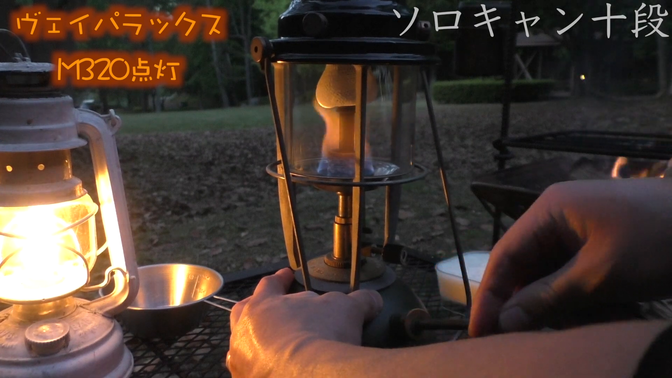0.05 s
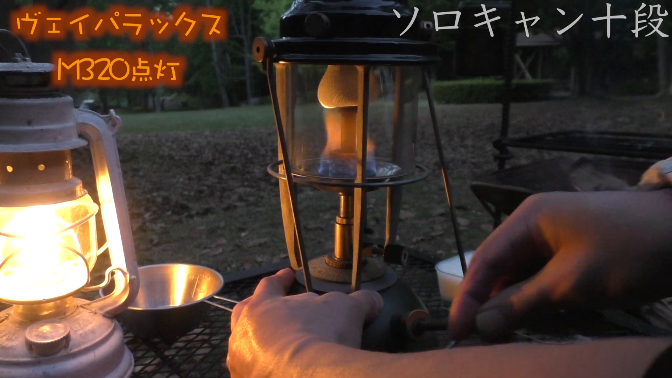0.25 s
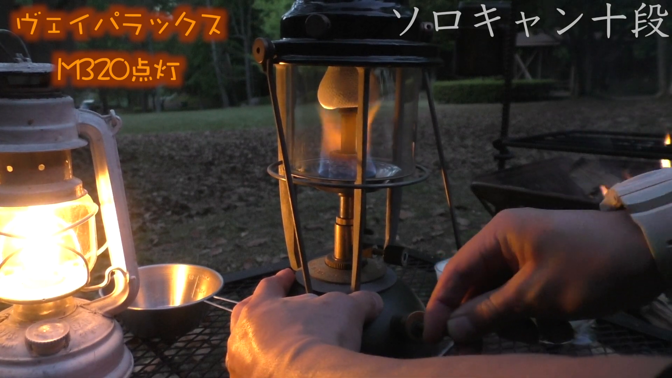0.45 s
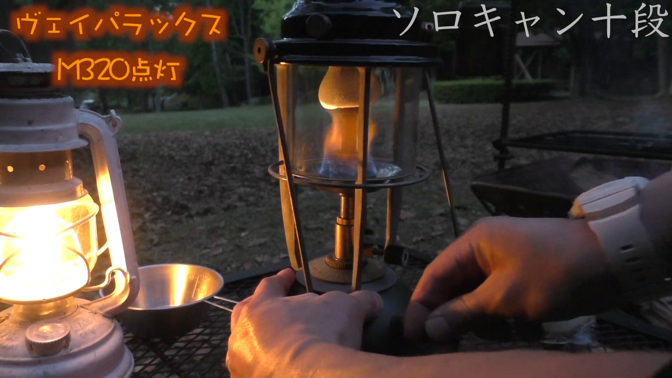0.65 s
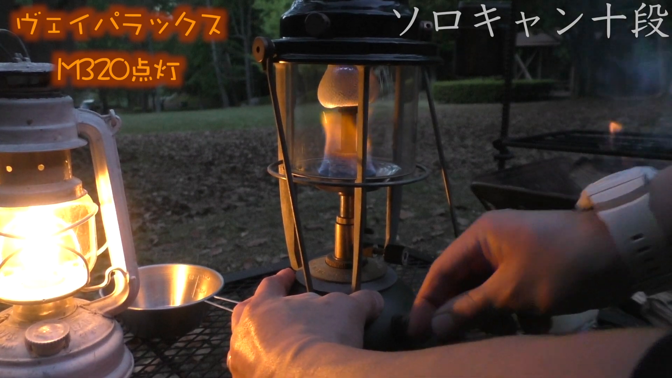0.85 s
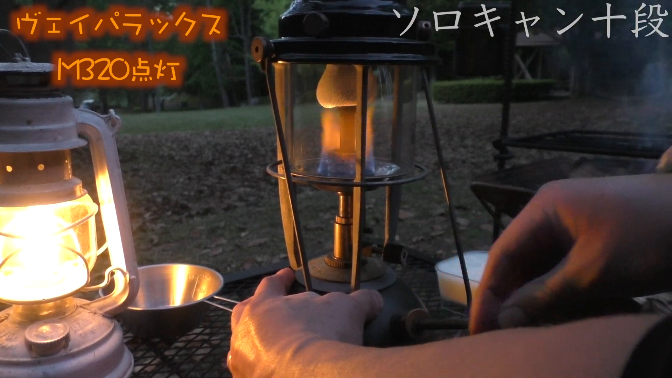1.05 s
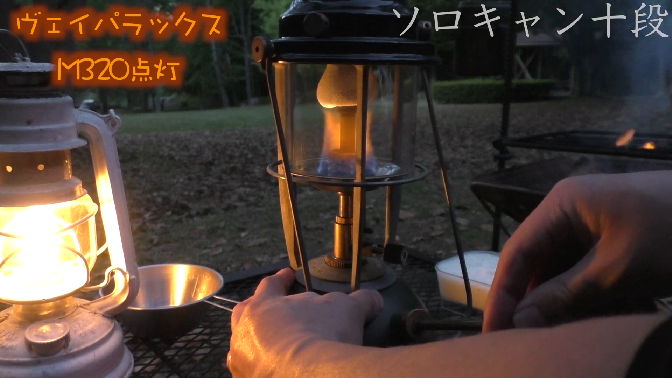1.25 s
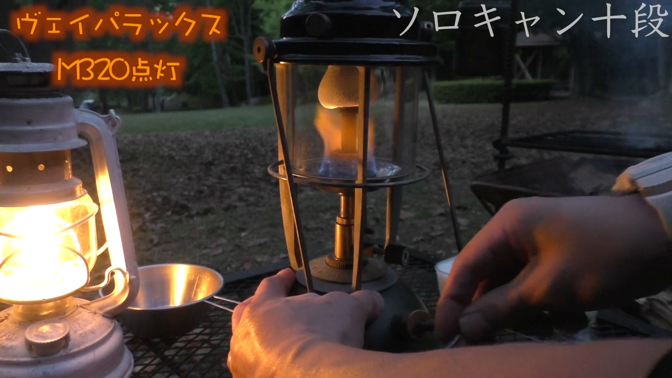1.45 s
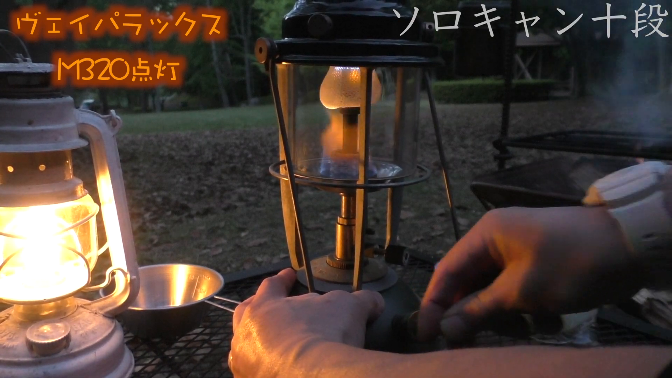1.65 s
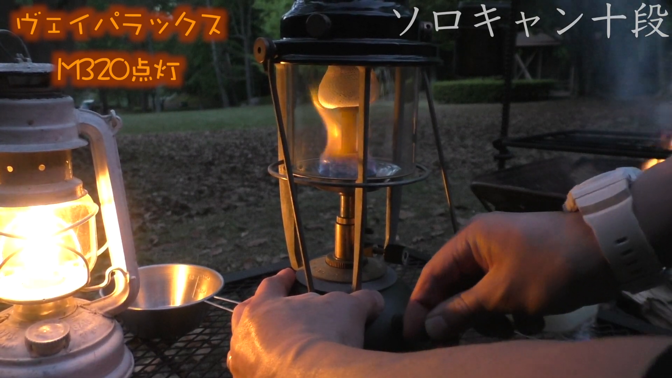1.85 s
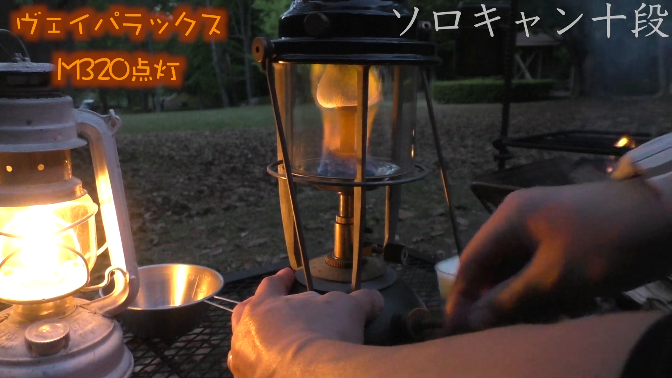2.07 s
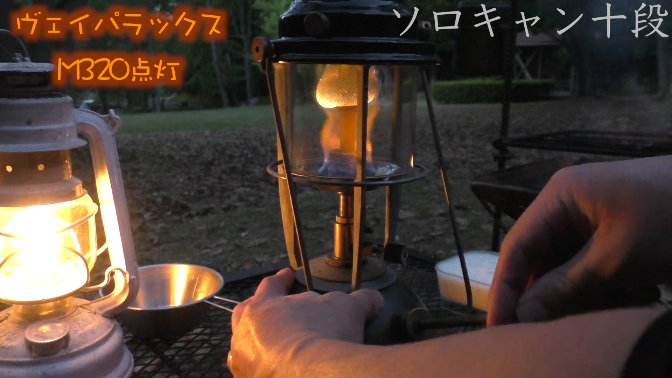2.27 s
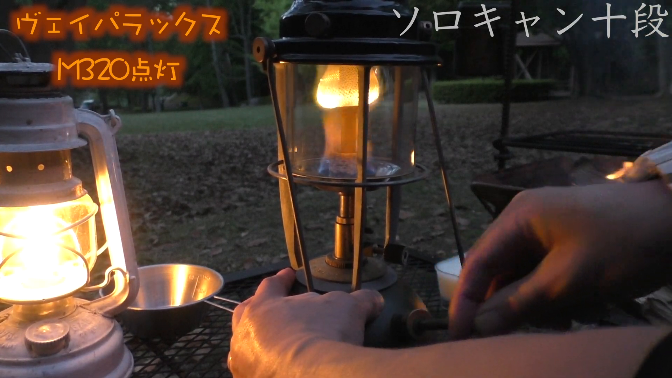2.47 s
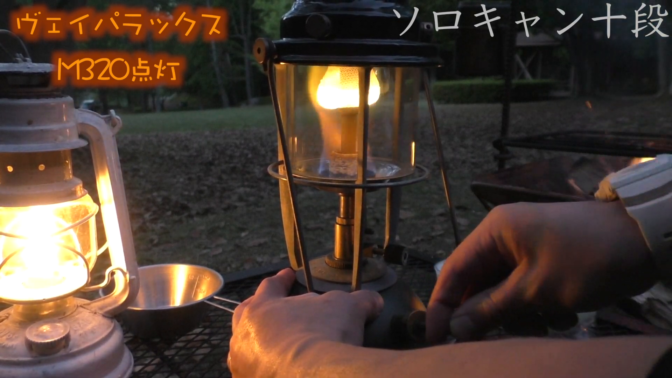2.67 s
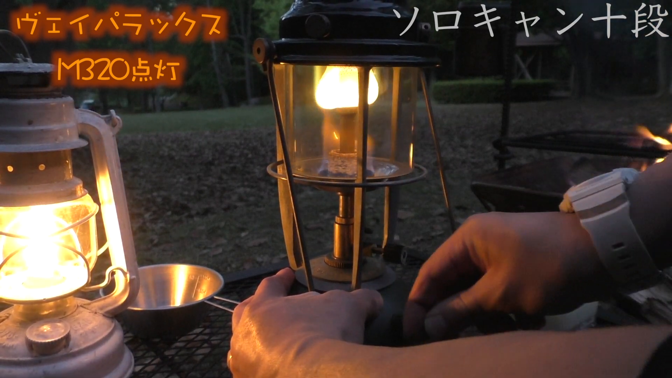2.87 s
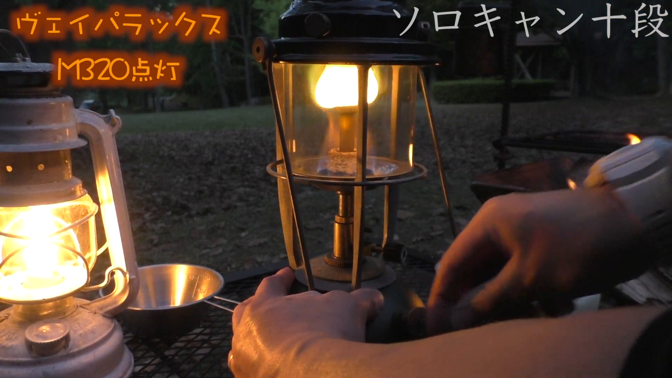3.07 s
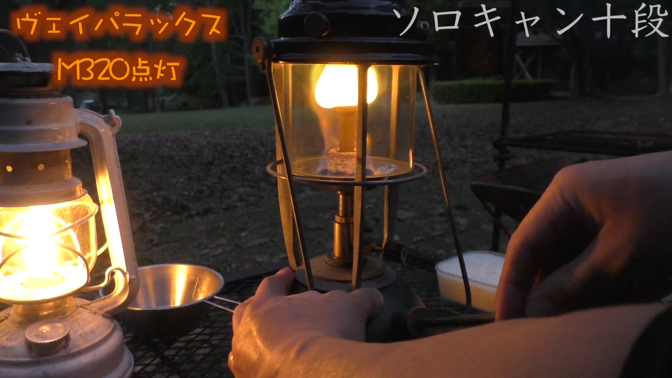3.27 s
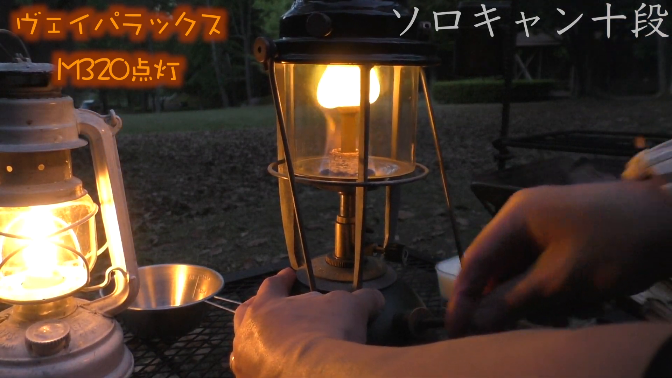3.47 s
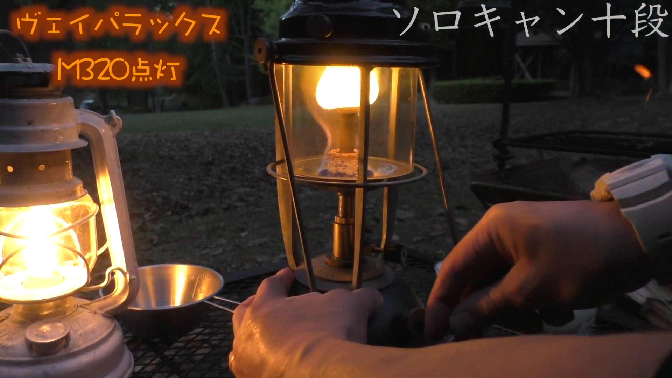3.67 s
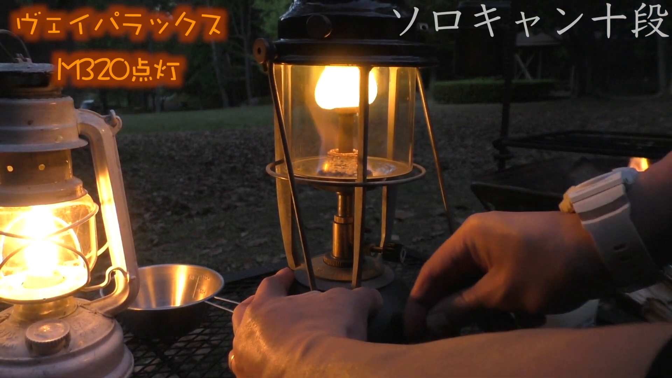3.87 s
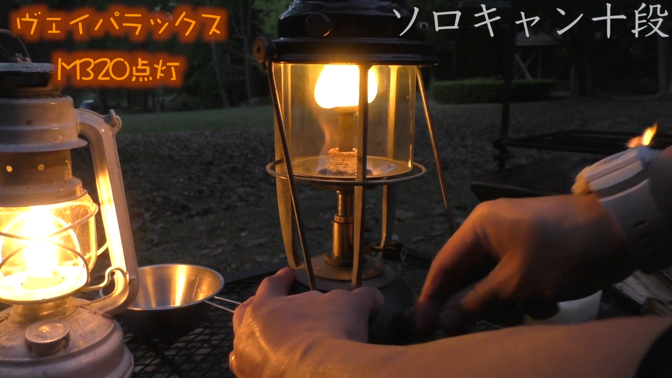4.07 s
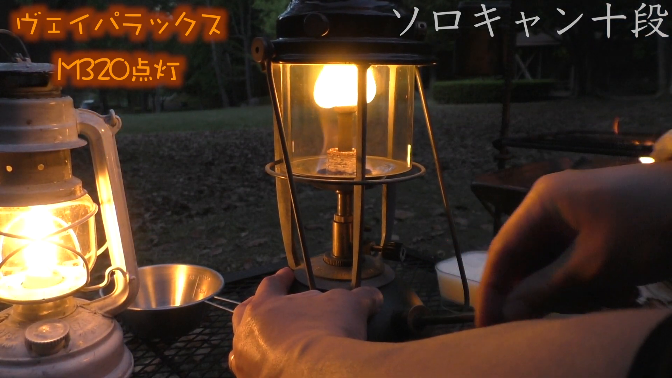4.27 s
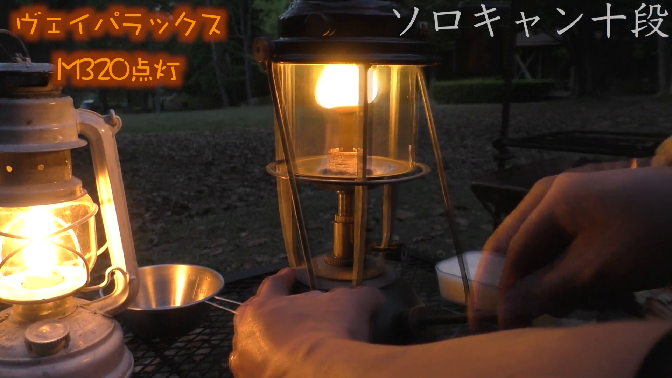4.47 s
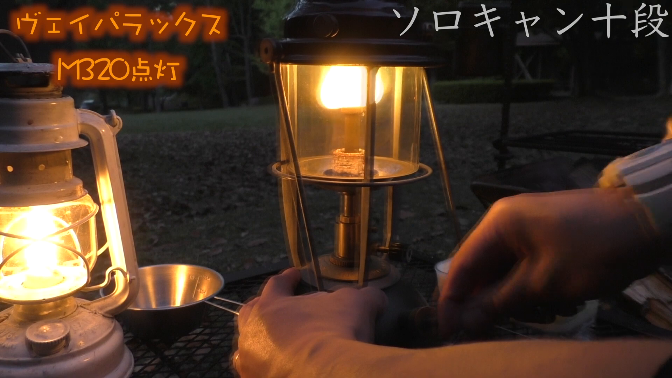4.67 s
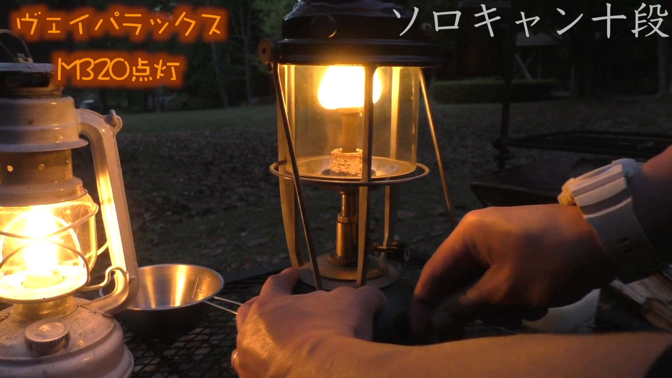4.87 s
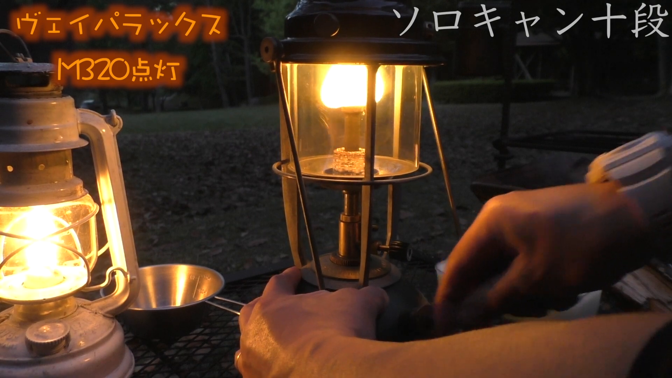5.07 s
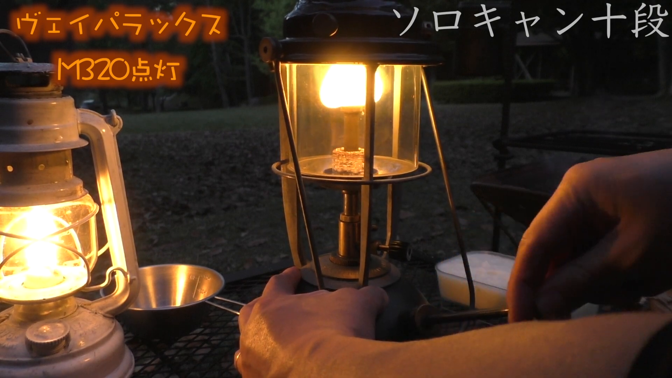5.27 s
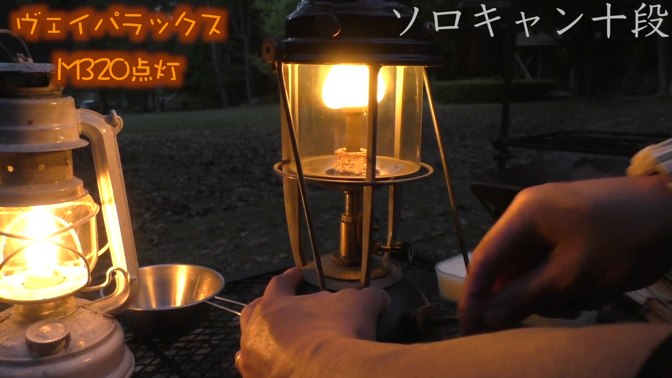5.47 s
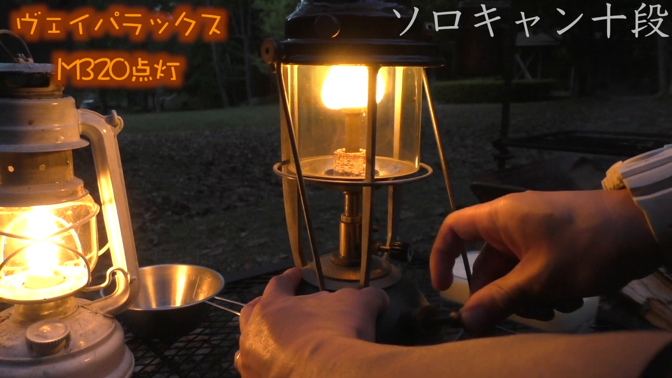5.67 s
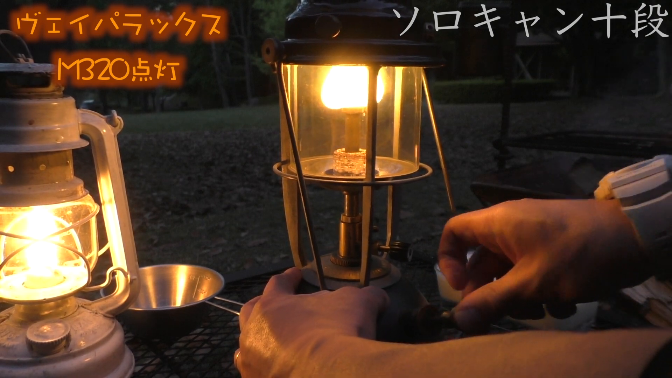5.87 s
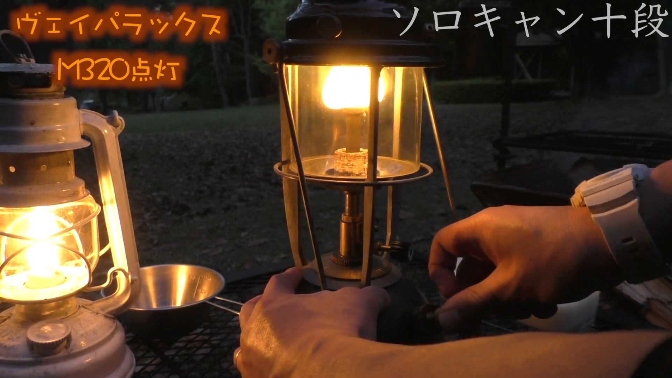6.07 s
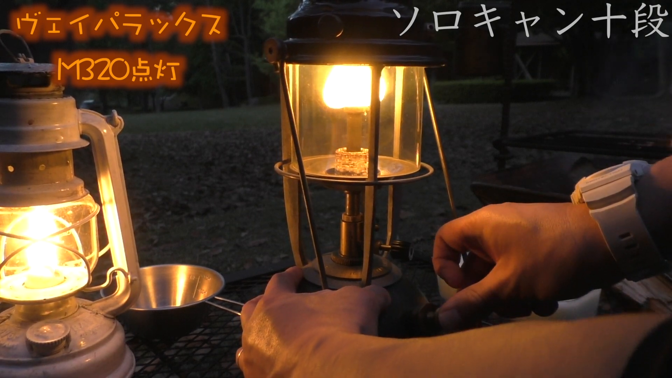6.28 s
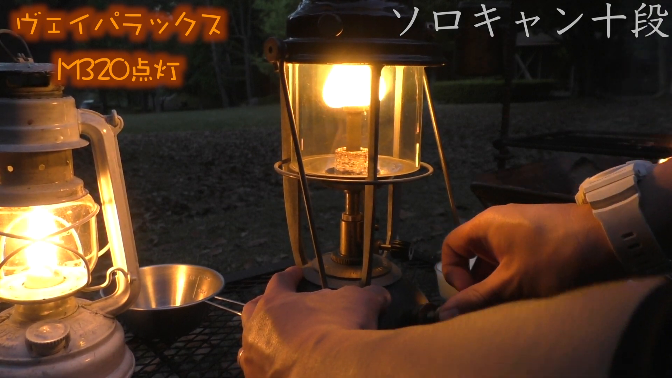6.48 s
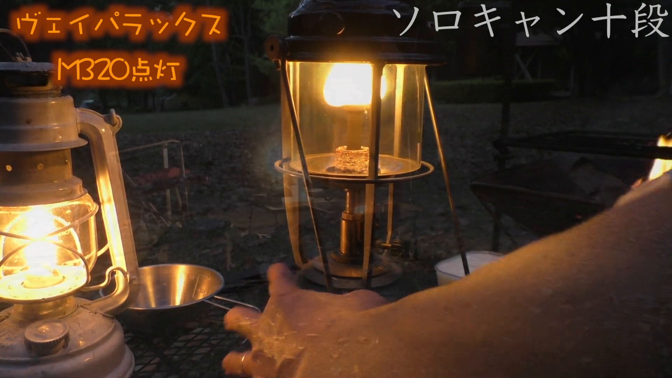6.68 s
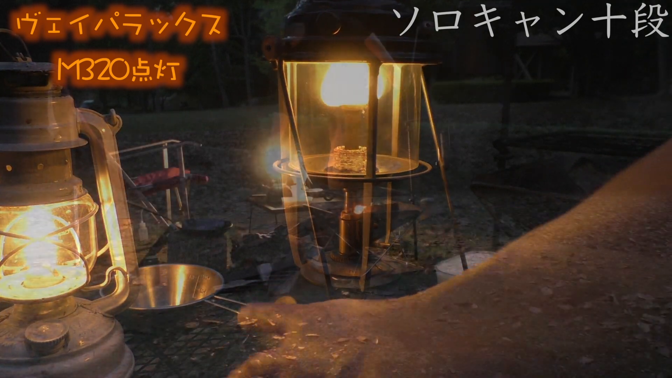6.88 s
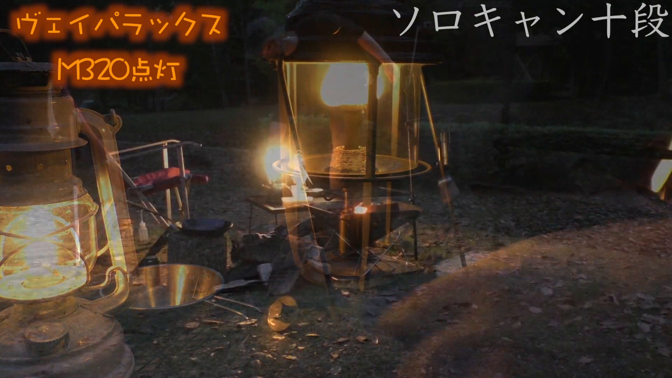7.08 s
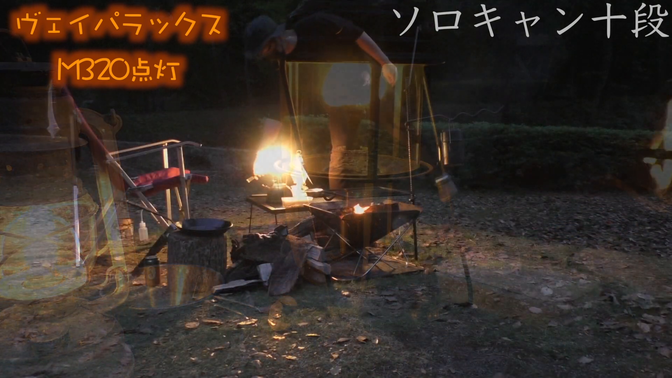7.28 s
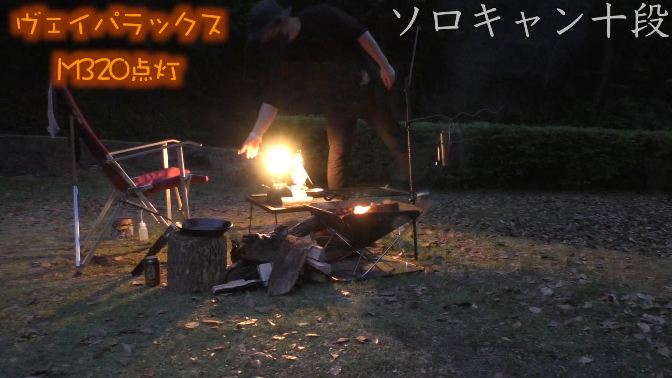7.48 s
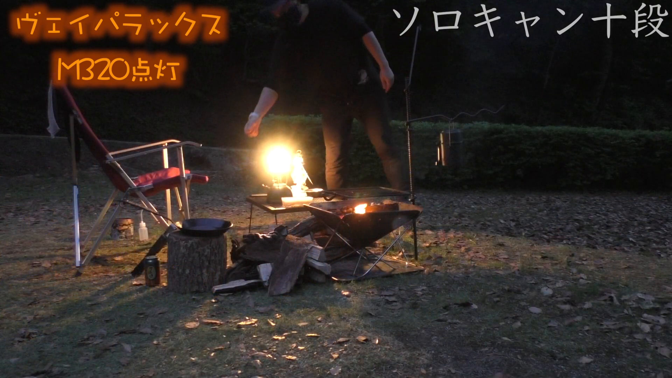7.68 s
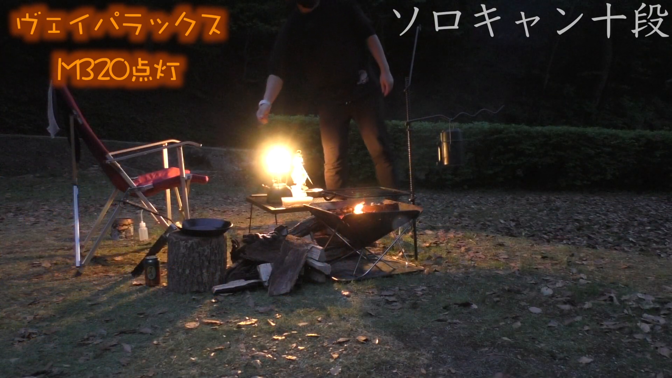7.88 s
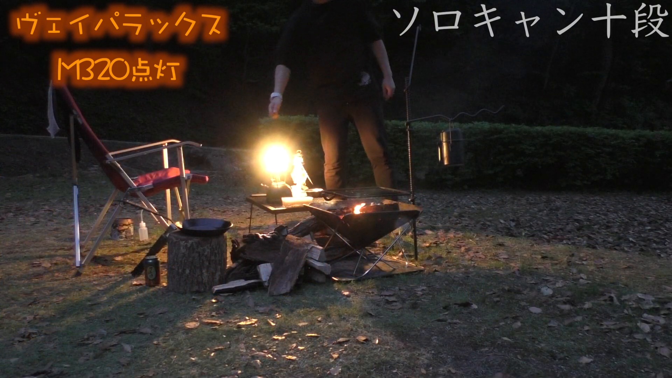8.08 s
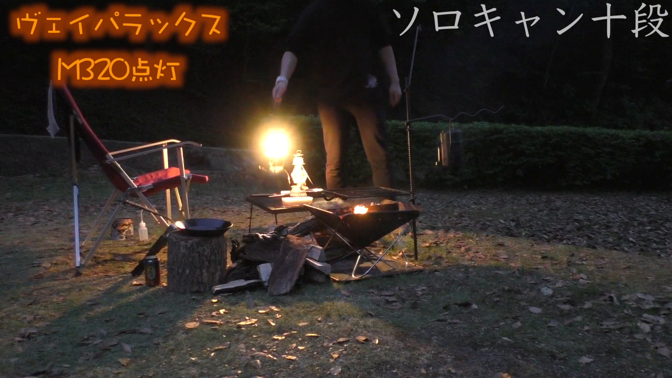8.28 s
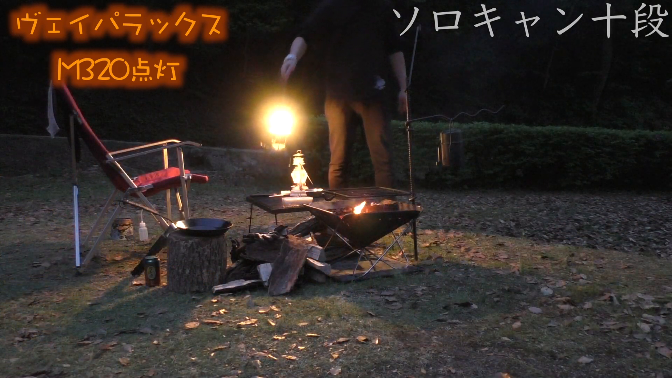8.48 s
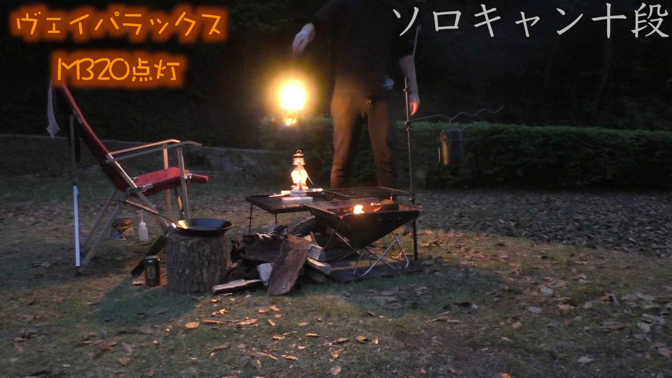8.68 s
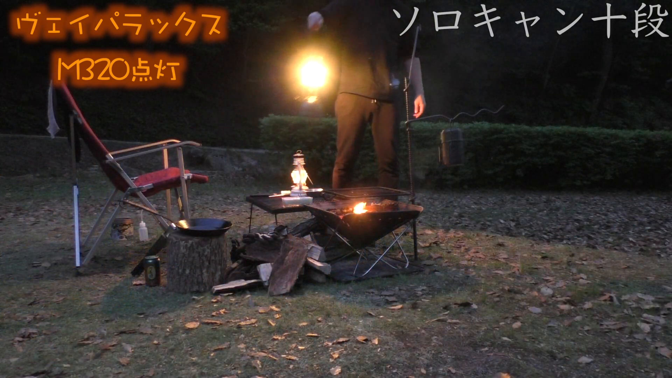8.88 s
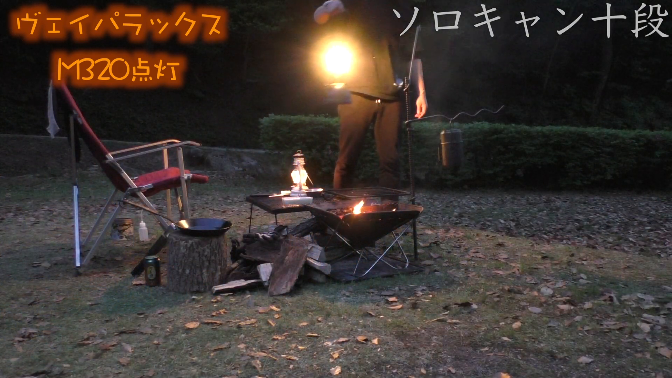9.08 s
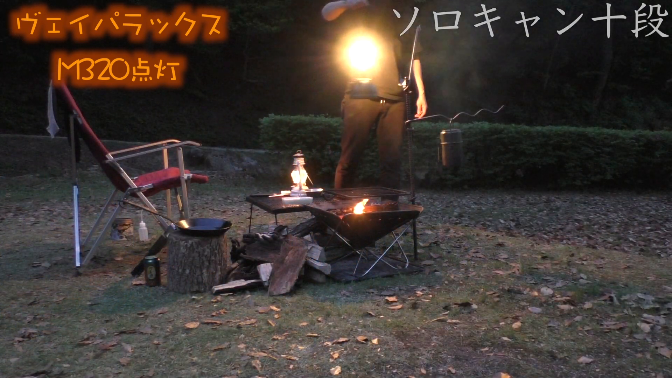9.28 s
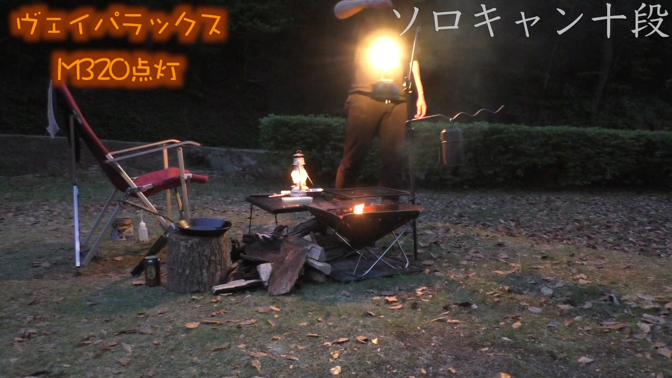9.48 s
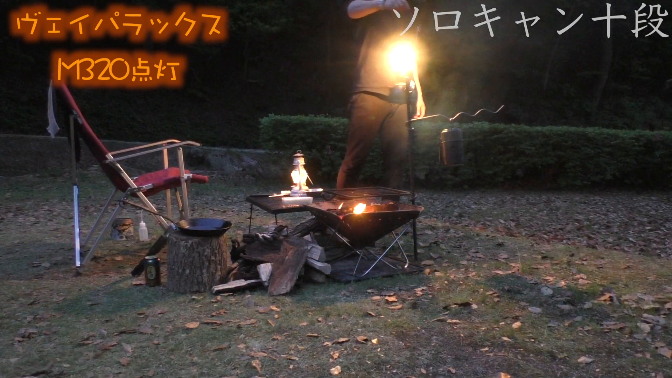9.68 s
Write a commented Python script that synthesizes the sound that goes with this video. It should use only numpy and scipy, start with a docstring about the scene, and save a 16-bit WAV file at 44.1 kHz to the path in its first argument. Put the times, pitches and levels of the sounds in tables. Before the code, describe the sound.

Close by in the open air, with low rumble and a soft distant rush, a lantern plunger is worked six times. Every push makes a crowding run of dry chuffs, a bubbly gurgle and a loud metal crack. Small flames pop and briefly flutter, while the burner hiss rises in steps. After a short squeak and grind of the knob, the near hiss fades into a fainter far one with sparse crackle and ticks.

```python
"""A low rumble and distant rush surround a lantern; metal ticks, fire crackle and faint flame pops begin.
Six pump strokes follow: the check valve chatters faster and faster as decaying noise bursts, bubble tones
gurgle through the fuel, and the plunger clacks home as a noise crack with brass modes while air seeps on.
Volleys of pressure pulses pop in the flame, and the burner's resonant noise hiss grows in steps.
The pump knob squeaks shut in harmonic tones; the hiss then fades from near to far beside the crackle."""
import sys
import numpy as np
from scipy import signal
from scipy.fft import rfft, irfft, next_fast_len
from scipy.io import wavfile
from scipy.ndimage import uniform_filter1d, minimum_filter1d, map_coordinates

SR = 44100
rng = np.random.default_rng(int(sys.argv[2]) if len(sys.argv) > 2 else 0)


def master_out(mix):
    """Clip the mix to full scale and print it as 16-bit PCM to the path in sys.argv[1]."""
    frames = np.transpose(np.atleast_2d(mix))
    ceiling = np.clip(frames, -1, 1)
    pcm = np.round(ceiling * 32767).astype(np.int16)
    wavfile.write(sys.argv[1], SR, pcm)


N = 429534  # length of the scene in samples


def amp(db):
    """Level definition: decibels to amplitude gain."""
    return 10 ** (np.asarray(db) / 20)


def unit(x):
    """Normalisation: scale to rms 1."""
    return x / np.sqrt(np.mean(x ** 2) + 1e-20)


def along(points, hz):
    """Logarithmic frequency scale: interpolate (f/Hz, value) points on it."""
    f, value = np.transpose(points)
    return np.interp(np.log(hz + 1), np.log(f), value)


def curves(rows, **ends):
    """Linear interpolation: one value per sample for each column after the time."""
    times, *columns = np.transpose(rows)
    return [np.interp(np.arange(N) / SR, times, column, **ends) for column in columns]


def ramp(start, length):
    """Linear onset: rises from 0 to 1 over length seconds."""
    return np.clip((np.arange(N) / SR - start) / length, 0, 1)


def wobble(rate):
    """Band-limited fluctuation: a smooth random curve through rate knots a second."""
    knots = rng.standard_normal(int(N * rate / SR) + 4)
    return map_coordinates(knots, [np.arange(N) * rate / SR])


def add(track, s, sound):
    """Superposition: mix a sound into a track at time s."""
    part = track[max(round(s * SR), 0):][:len(sound)]
    part += sound[:len(part)]


def filtered(x, response):
    """Linear filtering: multiply the spectrum of x by a response of frequency."""
    m = next_fast_len(N + 8192)
    return irfft(rfft(x, m) * response(np.fft.rfftfreq(m, 1 / SR)), m)[..., :N]


# Interchannel coherence of the sounds close by: f/Hz, left-right likeness/1
PUMP_COHERENCE = [(100, 0.51), (1000, 0.93), (14000, .95)]


def noise(spectrum, peaks=(), alike=PUMP_COHERENCE):
    """Source-filter principle: stereo noise of rms 1, shaped by a spectrum and bell-shaped resonances."""
    def response(hz):
        db = along(spectrum, hz)
        for centre, width, lift in peaks:
            db = db + lift * np.exp(-2 * ((hz - centre) / width) ** 2)
        # The angle shares the power between mid and side.
        turn = np.arccos(np.clip(along(alike, hz), 0, 1)) / 2
        return amp(db) * [np.cos(turn), np.sin(turn)]
    mid, side = filtered(rng.standard_normal((2, N)), response)
    return unit(np.array([mid + side, mid - side]))


def patchy(x, depth_db, size):
    """Turbulent intermittency: gain varies in patches of time and frequency."""
    z = signal.stft(x, nperseg=size)[2]
    field = uniform_filter1d(rng.standard_normal(z.shape[1:]), size=3, axis=0)
    field = uniform_filter1d(field, size=5, axis=1)
    varied = signal.istft(z * amp(depth_db * unit(field)), nperseg=size)[1]
    return unit(varied[:, :N])


def decays(rows, attack):
    """Exponential decay: envelope of bursts (t/s, level/dB, T60/s), summed in power."""
    power, t = np.zeros(N), np.arange(SR // 5) / SR
    for s, db, t60 in rows:
        burst = amp(db - 60 * t / t60) * (1 - np.exp(-t / attack))
        add(power, s, burst ** 2)
    return np.sqrt(power)


# Background level: t/s, rumble level/dB, distant rush level/dB
AIR_LEVELS = [(0, -51, -47), (2.5, -50.5, -48.5), (4.5, -52.5, -49), (6.5, -47, -48.5), (7.3, -53.5, -52),
              (9.74, -55, -49.5)]
# Spectral density of the rumble: f/Hz, relative level/dB
RUMBLE_SPECTRUM = [(20, -25), (50, -8), (120, 1), (250, 1.5), (350, -2), (440, -7), (560, -19), (800, -28),
                   (2000, -55)]
# Spectral density of the distant rush: f/Hz, relative level/dB
RUSH_SPECTRUM = [(100, 3.5), (400, -2), (600, -7), (800, -2.5), (1150, 2.5), (1750, 0.5), (2200, 3.5),
                 (2900, -5.5), (4500, -9.5), (7000, -12.5), (9000, -9), (16000, -12)]
# Interchannel coherence of the air, burner and gutter noise: f/Hz, left-right likeness/1
AIR_COHERENCE = [(30, .5), (120, 0.44), (400, 0.81), (2000, 0.74), (14000, 0.93)]


def campsite():
    """Ambient broadband noise: a low restless rumble and a soft distant rush."""
    rumble_db, rush_db = curves(AIR_LEVELS)
    rumble = patchy(noise(RUMBLE_SPECTRUM, alike=AIR_COHERENCE), depth_db=3.5, size=2048)
    rumble = amp(1.5 * wobble(9)) * rumble
    rush = patchy(noise(RUSH_SPECTRUM, alike=AIR_COHERENCE), depth_db=1.3, size=1024)
    rush = amp(.5 * wobble(6)) * rush
    rumble_balance = amp([[.7], [-.7]])  # left, right
    return amp(rumble_db) * rumble * rumble_balance + amp(rush_db) * rush


# Ticks of the handled metalwork: t/s, body level/dB, treble level/dB
METAL_TICKS = [(0.32, -40, -39), (1.148, -49, -45), (1.6, -36, -56), (1.898, -42, -39), (2.124, -28, -37),
               (2.207, -39, -32), (2.339, -35, -49), (2.4724, -30, -50), (3.0925, -36, -32.5),
               (3.235, -50, -31), (3.584, -39, -32.5), (4.017, -34.5, -33), (6.257, -28, -37),
               (6.588, -29.5, -26.5), (7.201, -47, -44), (7.874, -35.5, -48), (7.946, -38, -42),
               (8.138, -40, -35.5), (8.2818, -27, -24), (8.329, -35, -42)]
# Modes of the wire frame: f/Hz, level relative to the tick body/dB, T60/s
FRAME_MODES = [(1520, -15.5, .15), (2130, -14, 0.1), (3870, -20, 0.1), (4360, -21, 0.11),
               (8000, -16, 0.063)]
# Spectral density of a tick's body: f/Hz, relative level/dB
TICK_BODY_SPECTRUM = [(200, -16), (700, -3), (1600, 8), (3500, 1), (6000, -4), (16000, -30)]
# Spectral density of tick treble and fire crackle: f/Hz, relative level/dB
TICK_TREBLE_SPECTRUM = [(2000, -33), (5000, -3), (8500, 12), (12000, 6), (16000, 2)]


def ticks(crackle_db=-50, spread_db=4.5):
    """Impact excitation: metal ticks ring the frame's modes among the fire's faint random crackle."""
    sparks = []
    for u, v in rng.random((70, 2)):
        spark_db = crackle_db + spread_db * min(-np.log(1 - v), 3)
        sparks.append((u * N / SR, spark_db, .02))
    ring, t = np.zeros(N), np.arange(SR // 5) / SR
    hz, level, t60 = np.transpose(FRAME_MODES)[:, :, None]
    for s, body_db, _ in METAL_TICKS:
        strength_db = rng.normal(0, 2.4, hz.shape)
        modes = amp(body_db + level + strength_db - 60 * t / t60) * np.sin(2 * np.pi * hz * t)
        add(ring, s, modes.sum(axis=0))
    bodies = [(s, body_db, .035) for s, body_db, _ in METAL_TICKS]
    trebles = [(s, treble_db, .028) for s, _, treble_db in METAL_TICKS]
    body = decays(bodies, attack=0.00087) * noise(TICK_BODY_SPECTRUM)
    treble = decays(trebles + sparks, attack=0.0003) * noise(TICK_TREBLE_SPECTRUM)
    return ring + body + treble


# Pop volleys: t/s, length/s, pops/1, first level/dB, swell over the volley/dB, pulse width/s
POP_VOLLEYS = [(.818, .03, 3, -27, 0, .00055), (1.5067, .0125, 3, -18, 2, .0006),
               (1.7905, .0055, 2, -17, 2, .0007), (1.8056, .0105, 4, -11, 1, .00042),
               (2.7027, .009, 3, -17, 3, .0006), (7.948, 0, 1, -35, 0, .0006),
               (8.2838, 0, 1, -24, 0, .0006), (9.149, 0, 1, -34, 0, .0006)]
# Spectral density of the sputter after a pop: f/Hz, relative level/dB
SPUTTER_SPECTRUM = [(40, -27), (150, -21), (320, 1.5), (650, -21), (1100, -6.5), (1600, -17), (2500, -29),
                    (6000, -25.5), (15000, -44)]
# Resonances of the air in the glass globe: f/Hz, width/Hz, lift level/dB
GLOBE_RESONANCES = [(330, 67, 12.5), (930, 120, 17), (1060, 72, 6)]
# Guttering of the priming flame: t/s, level/dB, T60/s
FLAME_GUTTERS = [(4.035, -22, 0.21), (4.105, -16.5, 0.21)]
# Spectral density of the guttering: f/Hz, relative level/dB
GUTTER_SPECTRUM = [(20, -1), (50, 5), (110, 3), (200, -1), (350, -19), (700, -40), (2000, -80)]
GUTTER_RISE_S = 0.025
MURMUR_UNTIL_S, MURMUR_DB = 3.6, -44.5  # faint random pops of the priming flame; quietest level


def flame(suck=0.25, lag=3.1, sputter_db=-7):
    """Monopole radiation: each pop pushes air, sucks more slowly and sputters; the priming flame gutters."""
    pops, sputters = np.zeros(N), []
    t = np.arange(-SR // 100, SR // 50) / SR
    murmur = [(u * MURMUR_UNTIL_S, 0, 1, MURMUR_DB + 8 * v, 0, .0008) for u, v in rng.random((36, 2))]
    for start, length, count, first_db, swell_db, width in POP_VOLLEYS + murmur:
        for part in np.linspace(0, 1, count):
            late, wider = rng.standard_normal(2) * [.0004, .25]
            s = start + part * length + late
            db = first_db + part * swell_db
            u = t / (width * np.exp(wider))
            push = np.exp(-u ** 2)
            pull = suck * np.exp(-((u - lag) / 3.9) ** 2)
            add(pops, s + t[0], amp(db) * (push - pull) / (1 - suck))
            sputters.append((s, db + sputter_db, .025))
    sputter = decays(sputters, attack=0.00011) * noise(SPUTTER_SPECTRUM, GLOBE_RESONANCES)
    gutter = decays(FLAME_GUTTERS, attack=GUTTER_RISE_S) * noise(GUTTER_SPECTRUM, alike=AIR_COHERENCE)
    return (pops + sputter + gutter) * amp([[2], [-2.2]])  # left, right


# Pump strokes: t/s, first gap/s, exponent/1, valve level/dB before offsets, rise over the stroke/dB
# Chuff k comes k ** exponent first gaps after t.
PUMP_STROKES = [(.5472, .030, .783, -16, -.5), (1.6303, .0245, .785, -19, 4), (2.7225, .0205, .83, -18, 3),
                (3.7115, .0255, .75, -17, 5), (4.742, .0225, .785, -21, 9), (5.8735, .0245, .75, -17, -1)]
# Spectral density of a chuff: f/Hz, relative level/dB
CHUFF_SPECTRUM = [(40, -31), (150, 5), (500, -5.5), (1000, 7), (1600, 4), (2300, 3.5), (3200, -6.5),
                  (5300, -5.5), (8500, -3), (11000, -8.5), (16000, -16.5)]
# Resonances of the valve bore: f/Hz, width/Hz, lift level/dB
BORE_RESONANCES = [(1570, 72, 5.5), (4420, 390, 8.5), (6220, 500, 6), (8150, 600, 2.5), (12100, 820, 2.5)]


def valve(push_db=1.5, t60=0.0077, linger_db=-8, unseat_db=1, scatter_db=2.57):
    """Modulated jet noise: the check valve's uneven chuffs crowd together as the plunger speeds up."""
    chuffs = []
    for (start, gap, exponent, db, rise_db), (stop, *_) in zip(PUMP_STROKES, PLUNGER_STOPS):
        times = start + gap * np.arange(10) ** exponent
        progress = (times - start) / (stop - start)
        levels = push_db + db + rise_db * progress + scatter_db * rng.standard_normal(10)
        levels[0] += unseat_db  # the first chuff unseats the valve
        chuffs += [(s, level, t60) for s, level in zip(times, levels) if s < stop]
    opening = decays(chuffs, attack=.0013)
    leak = decays([(s, db + linger_db, .07) for s, db, _ in chuffs], attack=.002)
    rasp = amp(1.2 * wobble(500))
    return np.hypot(2 * opening, leak) * rasp * noise(CHUFF_SPECTRUM, BORE_RESONANCES)


def bubbles(pitch_hz, spread, cycles, size_db, count):
    """Damped bubble resonance: a steady swarm of short rising tones, rms 1."""
    t = np.arange(SR // 80) / SR
    when, pitch = rng.random(count), rng.standard_normal(count)
    size = np.minimum(rng.exponential(size=count), 3)
    turns = pitch_hz * np.exp(spread * pitch)[:, None] * t
    life = turns / cycles
    envelope = np.exp(-life) * (1 - np.exp(-2 * turns))
    tones = amp(size_db * size)[:, None] * np.sin(2 * np.pi * turns * (1 + life / 20)) * envelope
    places = (when * N).astype(int)[:, None] + np.arange(len(t))
    return unit(np.bincount(places.ravel(), tones.ravel(), N)[:N])


# Spectral density of the seeping hiss: f/Hz, relative level/dB
SEEP_SPECTRUM = [(100, 0), (400, 0.5), (1300, -0.5), (2500, -2), (4000, -5), (7000, -9), (16000, -20)]
BUBBLING_DB = -33.5  # air forced through the fuel, before gurgle and bass loss


def fuel(hiss_db=-2):
    """Bubble acoustics: air gurgles in during the stroke, then seeps on and dies away in fizz and hiss."""
    push, seep, t = np.zeros(N), np.zeros(N), np.arange(SR) / SR
    for (start, *_), (stop, *_, seep_db, half_life, _) in zip(PUMP_STROKES, PLUNGER_STOPS):
        stroke = signal.windows.tukey(int((stop - start) * SR), .15)
        add(push, start, amp(BUBBLING_DB) * stroke)
        add(seep, stop, amp(seep_db) * .5 ** (t / half_life))
    forced = bubbles(pitch_hz=575, spread=0.53, cycles=6.6, size_db=2.5, count=4000)
    fizz = bubbles(pitch_hz=1112, spread=0.686, cycles=2.44, size_db=3.5, count=3500)
    seeping = (fizz + amp(hiss_db) * noise(SEEP_SPECTRUM)) / np.sqrt(2)
    gurgle = amp(2 * wobble(35))
    swarm = gurgle * (push * forced + seep * seeping)
    return filtered(swarm, lambda hz: hz / np.hypot(hz, 260))  # the small tank radiates little bass


# Plunger stops: t/s, scrape level/dB, ring level/dB, ring tilt/(dB/octave), crack level/dB,
# seep level/dB, seep half-life/s, step of burner hiss level/dB
PLUNGER_STOPS = [(.6974, -23.5, -1, -1, -5.5, -36, .06, 0), (1.7516, -17, -1, 0, -4.5, -41, 0.26, 1),
                 (2.835, -22, 1, -0.5, -2, -37.5, 0.23, 4), (3.8275, -23, -1.5, -5, -8, -31, 0.084, -0.1),
                 (4.8485, -17, -2, -2.5, -9, -24.5, 0.09, 4.5), (5.9859, -21, -1, 5, -1.5, -34.5, 0.23, -1)]
# Modes of the pump tube and tank: f/Hz, relative level/dB, T60/s
BRASS_MODES = [(1120, -13, .02), (1310, -7, .013), (1505, 0, .019), (2155, 0, .024), (2440, -15, .014),
               (2800, -4, .023), (3470, -16, .018), (3780, -18, .016), (4160, -18, .016), (5770, -21, .018)]
# Snags of the rod: t/s, level/dB, T60/s
ROD_SNAGS = [(2.8194, -18, 0.055), (4.824, -27, 0.033), (4.858, -21, .04), (4.883, -24, 0.057),
             (4.976, -29.5, 0.04), (5.963, -3.5, 0.031)]
# Spectral density of the crack: f/Hz, relative level/dB
CRACK_SPECTRUM = [(30, -5), (110, 8), (300, -25), (700, -13), (1300, 7), (4000, -1), (6200, -11), (9000, 3),
                  (11000, -7.5), (13000, -9), (16000, -16)]
# Spectral density of the rod's scrape: f/Hz, relative level/dB
SCRAPE_SPECTRUM = [(40, -42), (200, -18), (1500, 12), (3000, 14.5), (5000, 6.5), (9000, 4), (12000, 0.5),
                   (16000, -9)]
# Spectral density of the bright snag rasp: f/Hz, relative level/dB
SNAG_SPECTRUM = [(40, -42), (200, -21), (1500, -5), (3000, 1), (5000, 5.5), (9000, 7), (11500, 8),
                 (13500, 3), (16000, -10)]
SCRAPE_LEAD_S, SCRAPE_T60_S = 0.0077, 0.13  # the rod scrapes in its cap just before the stop


def plunger():
    """Modal impact: the rod scrapes and snags; the plunger's stop cracks and rings the brass briefly."""
    ring, t = np.zeros(N), np.arange(SR // 10) / SR
    hz, level, t60 = np.transpose(BRASS_MODES)[:, :, None]
    octaves = np.clip(np.log2(hz / 1800), -1, .6)
    cracks, scrapes = [], []
    for stop, scrape_db, ring_db, tilt, crack_db, *_ in PLUNGER_STOPS:
        strength_db, detune = rng.standard_normal((2, len(BRASS_MODES), 1))
        colour_db = level + strength_db + tilt * octaves
        modes = amp(colour_db - 60 * t / t60) * np.sin(2 * np.pi * hz * (1 + .007 * detune) * t)
        add(ring, stop, amp(ring_db) * modes.sum(axis=0) * (1 - np.exp(-t / 0.0006)))
        cracks.append((stop, crack_db, .02))
        scrapes.append((stop - SCRAPE_LEAD_S, scrape_db, SCRAPE_T60_S))
    crack = decays(cracks, attack=.0001) * noise(CRACK_SPECTRUM)
    scrape = decays(scrapes, attack=0.00022) * noise(SCRAPE_SPECTRUM)
    snag = decays(ROD_SNAGS, attack=.00013) * noise(SNAG_SPECTRUM)
    return ring + crack + scrape + snag


# Spectral density of the near jet: f/Hz, relative level/dB
NEAR_JET_SPECTRUM = [(100, 1), (400, -1.5), (1500, 0), (3200, -1.5), (6000, -6), (10000, -4), (14000, -6),
                     (16000, -8)]
# Burner resonances heard near: f/Hz, width/Hz, lift level/dB
NEAR_RESONANCES = [(3970, 400, 7), (5030, 600, 10), (6450, 480, 9), (8700, 1000, 10), (11250, 1100, 8.5),
                   (12100, 550, 8.5), (13050, 500, 7), (15100, 1300, 6)]
# Far burner: t/s, level/dB
FAR_LEVELS = [(6.8, -73.5), (7.1, -53.5), (8.2, -52.5), (9.3, -54), (9.55, -50), (9.74, -51)]
# Spectral density of the far jet: f/Hz, relative level/dB
FAR_JET_SPECTRUM = [(300, -7.5), (1500, 5.5), (4000, 7), (8000, -2.5), (12000, -1), (16000, -7)]
# Burner resonances heard from afar: f/Hz, width/Hz, lift level/dB
FAR_RESONANCES = [(1955, 30, 13.4), (2360, 110, 6.4), (5200, 270, 6.3), (6600, 460, 5), (9150, 700, 11),
                  (11000, 810, 6.1), (12650, 550, 8)]
JET_OPENS_S, JET_OPENING_S = 1.15, .5  # the vapour jet starts up
JET_DB, SETTLE_S = -53, 0.12  # level before the pressure steps; length of each step
LEAVE_S, LEAVING_S = 6.75, .6  # the near hiss fades out


def burner():
    """Turbulent jet noise: hiss steps with the pressure after each stroke, and is later heard from afar."""
    pressure_db = sum(step_db * ramp(stop, SETTLE_S) for stop, *_, step_db in PLUNGER_STOPS)
    opening, leaving = ramp(JET_OPENS_S, JET_OPENING_S), ramp(LEAVE_S, LEAVING_S)
    near = amp(JET_DB + pressure_db) * opening * (1 - leaving)
    far = amp(curves(FAR_LEVELS, left=-120)[0])
    near_hiss = noise(NEAR_JET_SPECTRUM, NEAR_RESONANCES, AIR_COHERENCE)
    near_hiss = patchy(near_hiss, depth_db=1.5, size=512)
    far_hiss = noise(FAR_JET_SPECTRUM, FAR_RESONANCES, AIR_COHERENCE)
    far_hiss = patchy(far_hiss, depth_db=2, size=2048)
    return amp(0.18 * wobble(3.13)) * (near * near_hiss + far * far_hiss)


# Knob squeaks: t/s, length/s, start f/Hz, end f/Hz, level/dB before the fades, roughness/1
KNOB_SQUEAKS = [(6.558, 0.082, 874, 860, -37.5, 0.22), (6.933, 0.089, 433, 424, -50, 0.5)]
# Harmonic envelope of a squeak: f/Hz, relative level/dB
KNOB_SPECTRUM = [(400, 8), (880, -1.5), (1760, 2.5), (2600, -10), (3500, -22), (4400, -10), (6000, -17),
                 (14000, -31)]
# Resonances of the valve seat: f/Hz, width/Hz, lift level/dB
SEAT_RESONANCES = [(450, 150, 24.5), (895, 250, 19), (2320, 190, 14), (2800, 300, 9), (3500, 300, 9)]


def knob():
    """Stick-slip friction: the thread gives short harmonic squeaks and grinds onto its seat."""
    squeaks = np.zeros(N)
    for s, length, start_hz, end_hz, db, rough in KNOB_SQUEAKS:
        n = int(length * SR)
        jitter = unit(uniform_filter1d(rng.standard_normal(SR), size=40))[:n]
        pitch_hz = np.linspace(start_hz, end_hz, n) * (1 + 0.13 * rough * jitter)
        phase = 2 * np.pi * np.cumsum(pitch_hz) / SR
        tone = sum(amp(along(KNOB_SPECTRUM, k * start_hz)) * np.sin(k * phase) for k in range(1, 10))
        add(squeaks, s, amp(db) * unit(tone) * signal.windows.tukey(n, .5))
    grind = decays([(6.637, -26, 0.082)], attack=0.0018) * noise(TICK_BODY_SPECTRUM, SEAT_RESONANCES)
    return squeaks + grind


# Reverberation of the clearing: f/Hz, T60/s
CLEARING_DECAY = [(150, 0.074), (1500, 0.38), (4000, 0.16), (12000, 0.011)]


def clearing(x):
    """Diffuse scattering: ground, gear and trees return a short tail of decaying noise."""
    hz, t, z = signal.stft(rng.standard_normal((2, SR // 2)), SR, nperseg=256)
    decay = amp(-60 * t / along(CLEARING_DECAY, hz)[:, None])
    tail = signal.istft(z * decay, SR, nperseg=256)[1]
    tail = tail / np.linalg.norm(tail[0])
    mid, side = signal.fftconvolve(x.mean(axis=0)[None], tail, axes=1)[:, :N]
    return np.array([mid + 0.17 * side, mid - 0.27 * side])


def scene():
    """Superposition: the campsite, the flame and burner, the pump and metalwork close by with their echo."""
    air, fire = campsite(), flame()
    pump = (ticks() + valve() + fuel() + plunger() + knob()) * amp([[-.3], [.3]])  # left, right
    echo = amp(-28) * clearing(pump)
    return air + fire + pump + echo + burner()


TOP_HZ = 15850  # nothing sounds from here up


def record(dry):
    """Peak limiting: a loud peak ducks everything for a moment; the rest saturates at full scale."""
    ceiling, hold_s = amp(4.5), .048
    size = int(hold_s * SR) | 1
    needed = np.minimum(1, ceiling / (np.abs(dry).max(axis=0) + 1e-9))
    held = minimum_filter1d(needed, size, origin=size // 2)  # the gain stays down after a peak
    limited = dry * uniform_filter1d(held, size=64)
    squashed = limited / (1 + np.abs(limited) ** 6) ** (1 / 6)
    bass_cut = lambda hz: 1j * hz / (1j * hz + 50)
    return filtered(squashed, lambda hz: bass_cut(hz) * (hz < TOP_HZ))


dry = scene()
out = record(dry)
master_out(out)
```